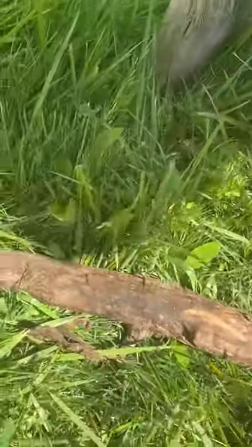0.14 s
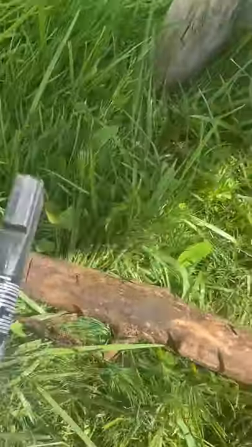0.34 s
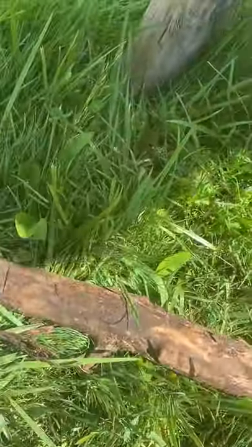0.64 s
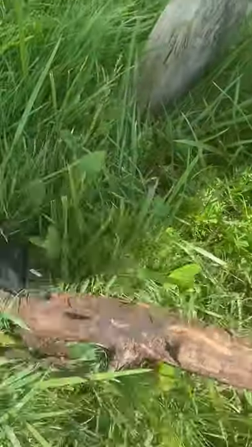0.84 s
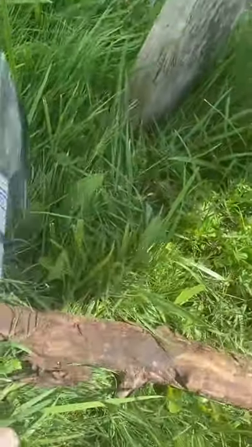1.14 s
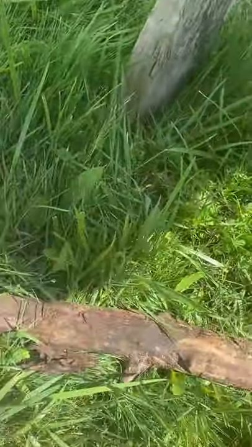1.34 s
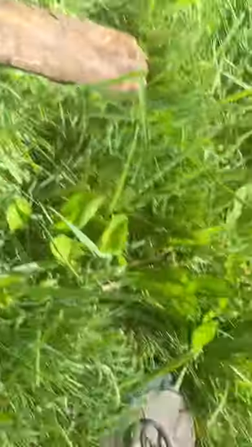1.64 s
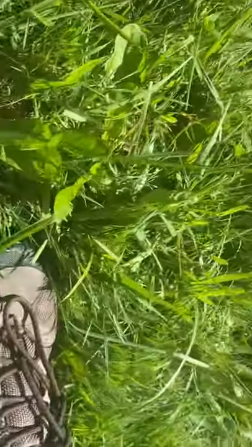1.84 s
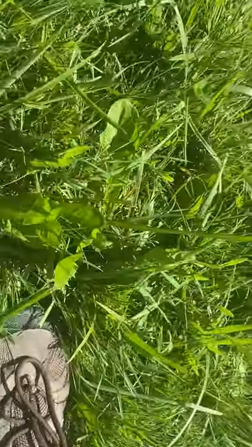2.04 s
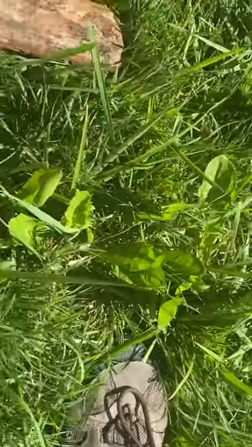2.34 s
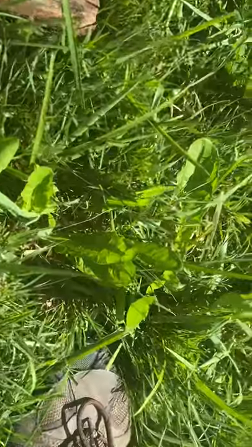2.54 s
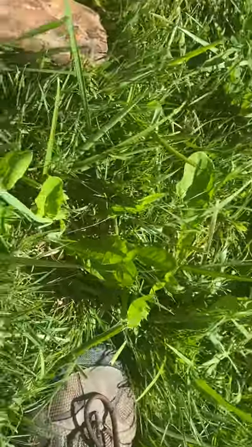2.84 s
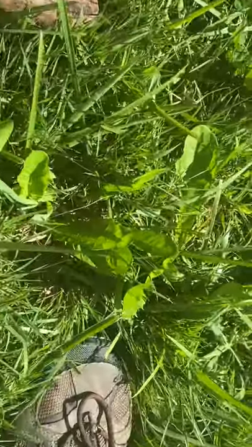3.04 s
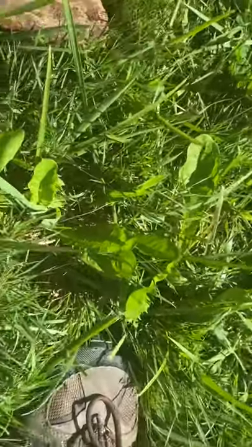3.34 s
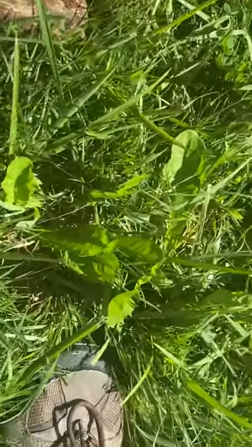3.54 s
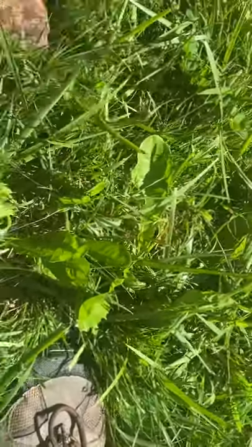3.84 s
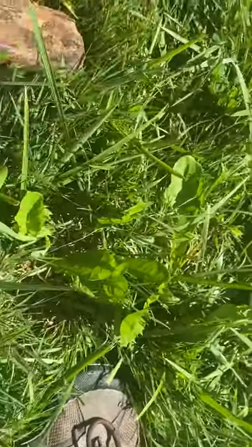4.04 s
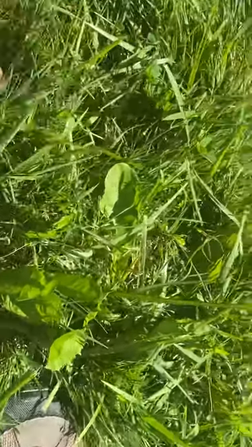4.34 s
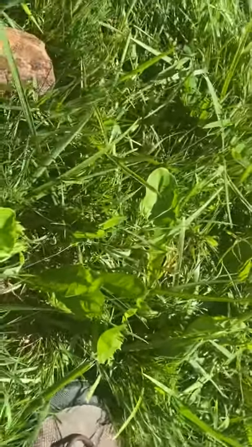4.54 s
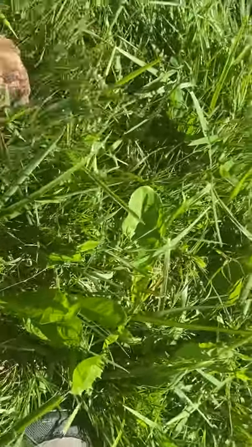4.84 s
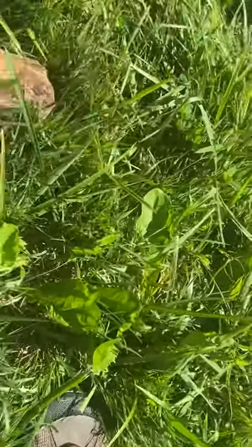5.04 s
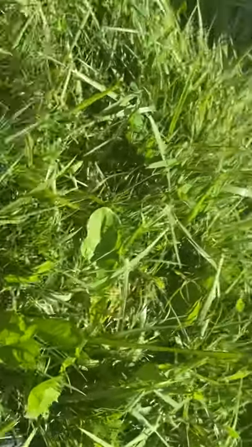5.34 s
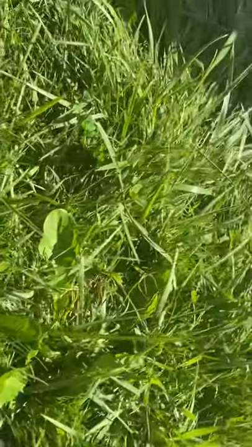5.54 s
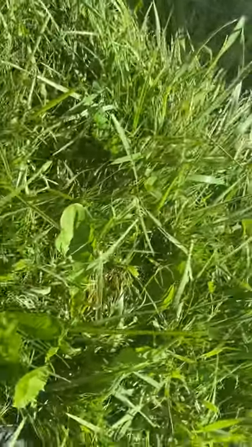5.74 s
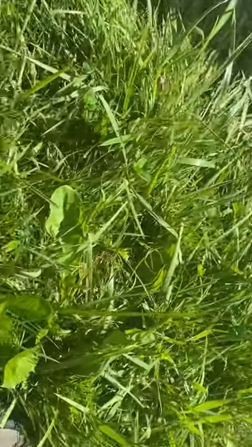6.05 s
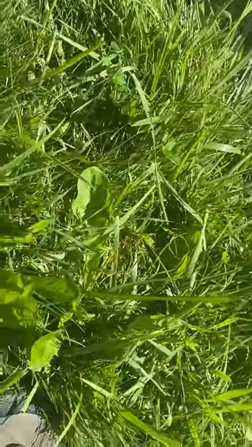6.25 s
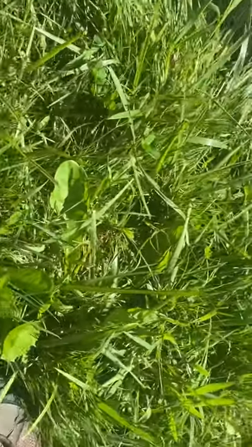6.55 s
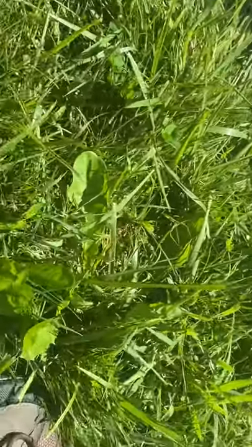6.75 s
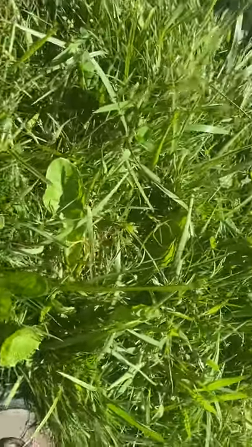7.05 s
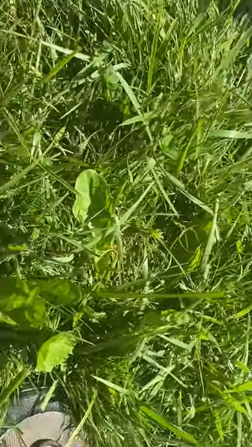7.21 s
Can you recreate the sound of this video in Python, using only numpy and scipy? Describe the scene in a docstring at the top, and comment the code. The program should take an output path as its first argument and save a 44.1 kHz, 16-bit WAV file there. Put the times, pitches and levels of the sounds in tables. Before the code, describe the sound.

Twelve sharp hatchet chops crack into a dry dead branch on turf, each with a woody knock and low thump, grass rustling, faint birds.

```python
"""A small hatchet chops twelve times into a dead branch that lies in long grass, close to the microphone.
Each blow cracks the fibres (noise bursts), rings the dry wood (clicked modes) and thumps it into the turf (low sines).
Grass rustles between blows (coloured clicks), a sleeve rubs, chips tick and something hollow knocks softly.
Far off, a bird whistles a few long notes (wavering sines) while others chip and chatter (swells of noise).
A nearly steady low outdoor rumble lies under it all."""
import sys
import numpy as np
from scipy import signal
from scipy.fft import rfft, irfft, next_fast_len
from scipy.io import wavfile

SR = 44100
rng = np.random.default_rng(int(sys.argv[2]) if len(sys.argv) > 2 else 0)


def generate_wav(signal):
    """Clip the signal to [-1, 1] and save it as 16-bit WAV at the path in sys.argv[1]."""
    frames = np.transpose(np.atleast_2d(signal))
    scaled = np.clip(frames, -1, 1) * 32767
    pcm = np.round(scaled).astype(np.int16)
    wavfile.write(sys.argv[1], SR, pcm)


N = 325364
TIME = np.arange(N) / SR
BLOW_S = 0.5   # room given to each short sound
AGE = TIME[:int(BLOW_S * SR)]   # seconds since a short sound began
LEVEL_WINDOW_S = 0.05


def from_db(db):
    """Decibels to gain."""
    return 10 ** (np.asarray(db) / 20)


def rms_one(x):
    """Scale to rms 1."""
    return x / np.sqrt(np.mean(x ** 2) + 1e-20)


def at_level(x, db):
    """Scale a short sound so that its energy, spread over the level window, has this rms."""
    window_rms = np.sqrt(np.sum(x ** 2) / (LEVEL_WINDOW_S * SR) + 1e-20)
    return x * from_db(db) / window_rms


def add(track, sound, s):
    """Mix a sound into a track at a time."""
    i = max(int(round(s * SR)), 0)
    part = sound[..., :max(N - i, 0)]
    track[..., i:i + part.shape[-1]] += part


def at_hz(points, hz):
    """Read a spectrum on a log-frequency axis."""
    knots, values = np.transpose(points)
    return np.interp(np.log(np.maximum(hz, 1)), np.log(knots), values)


def coloured(x, points):
    """Causal (minimum-phase) filter with a given spectrum, falling 40 dB in the octave beyond each end."""
    size = 2 * next_fast_len(len(x) // 2 + 2048)
    hz = np.arange(size // 2 + 1) * SR / size
    below = (points[0][0] / 2, points[0][1] - 40)
    above = (points[-1][0] * 2, points[-1][1] - 40)
    log_gain = np.log(from_db(at_hz([below, *points, above], hz)))
    # folding the cepstrum onto positive times makes the filter minimum-phase
    cepstrum = irfft(log_gain)
    cepstrum[1:size // 2] *= 2
    cepstrum[size // 2 + 1:] = 0
    return irfft(rfft(x, size) * np.exp(rfft(cepstrum)))[:len(x)]


def drift(rate):
    """Slow chance with rms 1: random knots, this many per second, joined by straight lines."""
    knots = rng.standard_normal(int(N / SR * rate) + 2)
    return rms_one(np.interp(TIME * rate, np.arange(len(knots)), knots))


def ring(force, hz, t60):
    """One mode: a unit click sets a dying sine of starting height 1 ringing."""
    radius = from_db(-60 / (t60 * SR))
    angle = 2 * np.pi * hz / SR
    return signal.lfilter([0, np.sin(angle)], [1, -2 * radius * np.cos(angle), radius ** 2], force + 1e-18)


def dying(t60):
    """Exponential decay, 60 dB down after t60 seconds."""
    return from_db(-60 * AGE / t60) + 1e-18


def swelling(hz, t60):
    """A heavy mode that is pushed down first, gathers motion and dies."""
    return -np.sin(2 * np.pi * hz * AGE) * hz * AGE * dying(t60)


def swell(s, half_s, db):
    """A smooth rise and fall of gain around a moment."""
    return from_db(db) * np.exp(-np.minimum(((TIME - s) / half_s) ** 2, 50))


def grains(size, spread_db):
    """Dense clicks of uneven strength."""
    return rng.standard_normal(size) * from_db(spread_db * np.minimum(rng.exponential(1, size), 5))


# spectrum of the outdoor rumble: pitch_hz, level_db
AIR_COLOUR = [(25, -25), (45, -7.5), (100, -3.5), (150, -13), (250, -20), (350, -22), (520, -29),
              (700, -37.5), (1300, -36.5), (1650, -36), (2200, -47), (5000, -53), (14000, -72.5)]


def outdoor_rumble(level_db=-51.5, waver_db=1.2):
    """Low, nearly steady rumble far off: coloured noise whose level wavers slightly."""
    waver = waver_db * drift(8)
    return from_db(level_db + waver) * rms_one(coloured(rng.standard_normal(N), AIR_COLOUR))


# bumps of the hand that holds the microphone: start_s, level_db
BUMPS = [(0.021, -40.5), (0.039, -32), (0.073, -38.5), (0.09, -34)]
# low modes of the microphone's body: pitch_hz, level_db, t60_s
BUMP_MODES = [(78.3, 0, 0.036), (200, -13, .022)]


def microphone_bumps():
    """The hand shifts on the microphone and pushes the low modes of its body."""
    out = np.zeros(N)
    for s, db in BUMPS:
        bump = sum(from_db(mode_db) * swelling(hz, t60) for hz, mode_db, t60 in BUMP_MODES)
        add(out, at_level(bump, db), s)
    return out


# steps and shuffles in the grass: middle_s, half_length_s, level_db
SHUFFLES = [(0.024, 0.045, -54.5), (0.721, 0.062, -61.5), (0.868, 0.041, -55), (1.746, .1, -68),
            (2.54, .045, -65.5), (4.064, 0.031, -70), (5.463, 0.024, -63.5), (7.12, 0.044, -62)]


def grass_shaking(level_db=-65.5, rise_s=.022, fade_s=0.079):
    """How strongly the grass moves: each step swells, each blow shakes it for a while and then it calms."""
    shaking = sum(swell(*shuffle) for shuffle in SHUFFLES)
    for s, *_, length_s, _ in CHOPS:
        rise = np.clip((TIME - s) / rise_s, 0, 1)
        fade = np.exp(-np.clip((TIME - s - length_s) / fade_s, 0, 30))
        shaking += from_db(level_db) * rise * fade
    return shaking


# spectrum of the rustling grass: pitch_hz, level_db
RUSTLE_COLOUR = [(800, -1.5), (2000, 0), (3000, -4), (5000, -2.5), (7500, -4.5), (8500, -4.5), (9400, -3.5),
                 (10500, -2.5), (11400, -10.5), (12200, -29.5), (15000, -31)]


def rustling_grass(shaking, flutter_db=2.5, snaps_per_s=67, snaps_db=-7.5):
    """Blades brush in dense fluttering clicks, and dry stalks snap now and then while the grass moves."""
    blades = from_db(flutter_db * drift(40)) * rms_one(grains(N, spread_db=2.5))
    snaps = rms_one((rng.random(N) < snaps_per_s / SR) * rng.standard_normal(N))
    return shaking * rms_one(coloured(blades + from_db(snaps_db) * snaps, RUSTLE_COLOUR))


# spectrum of the rubbing sleeve: pitch_hz, level_db
RUB_COLOUR = [(500, -20), (900, -18), (1350, -13.5), (1580, -2.5), (1700, 0.5), (1850, -5), (2100, -15),
              (2500, -20), (2950, -15), (3500, -24.5), (5000, -35)]


def rubbing_sleeve(shaking, lift_lead_s=.27, lift_half_s=.15, waver_db=4.5, with_grass_db=-14):
    """Cloth noise swells as the arm lifts the hatchet, and a little whenever the grass is moved."""
    lifting = sum(swell(s - lift_lead_s, lift_half_s, sleeve_db) for s, *_, sleeve_db in CHOPS)
    moving = np.hypot(lifting, from_db(with_grass_db) * shaking)
    cloth = rms_one(coloured(rng.standard_normal(N), RUB_COLOUR))
    return moving * from_db(waver_db * drift(15)) * cloth


# short raspy bird chips: middle_s
CHIPS = [0.055, 1.3, 2.256, 2.975, 3.513, 5.228, 6.311]
# spectrum of a chip: pitch_hz, level_db
CHIP_COLOUR = [(2000, -8), (3500, -9), (4400, 5.5), (6400, 0.5), (7600, -16)]


def bird_chips(level_db=-57, half_s=0.017):
    """Hoarse chips, all of one length and level: short swells of noise through the throat."""
    chips = sum(swell(s, half_s, level_db) for s in CHIPS)
    return chips * rms_one(coloured(rng.standard_normal(N), CHIP_COLOUR))


# bouts of lower, evenly spaced chatter: first_call_s, end_s, level_db
CHATTER = [(0.07, .14, -57.5), (0.461, .54, -61), (0.59, .67, -60)]
# spectrum of the chatter: pitch_hz, level_db
CHATTER_COLOUR = [(1400, -6), (2300, 4), (2900, -2.5), (3700, -11.5), (5200, -9), (6500, -29)]


def bird_chatter(gap_s=0.043, half_s=.013):
    """Evenly spaced calls, lower than the chips: swells of noise through the throat."""
    calls = 0
    for first, end, db in CHATTER:
        for s in np.arange(first, end, gap_s):
            calls = calls + swell(s, half_s, db)
    return calls * rms_one(coloured(rng.standard_normal(N), CHATTER_COLOUR))


# soft hollow knocks: start_s, level_db
KNOCKS = [(0.143, -46.5), (0.859, -63), (1.461, -59), (2.528, -52.5), (5.492, -55.5), (6.217, -62.5),
          (7.36, -61)]


def hollow_knocks(low_hz=430, high_hz=545, t60=0.05):
    """Something hollow knocks softly: two modes swell and die together."""
    out = np.zeros(N)
    for s, db in KNOCKS:
        add(out, at_level(swelling(low_hz, t60) + swelling(high_hz, t60), db), s)
    return out


# edges between the registers of the wood: pitch_hz
REGISTER_EDGES_HZ = [420, 900, 1450, 2400, 4000]
# ringing of the dry wood, damped by the blade inside it, before detuning: pitch_hz, level_db, t60_s
WOOD = [(520, -4.5, 0.033), (574, -0.5, .022), (751, 2.5, 0.026), (829, -3, 0.025), (974, -2.5, 0.026),
        (1175, -4.5, 0.02), (1234, -0.5, 0.02), (1435.2, -3.5, 0.023), (1536, -1, 0.014), (1670, 1, 0.024),
        (1823, 0, 0.017), (2066, -0.5, 0.011), (2202, -3.5, .014), (2630, -6, 0.0085), (2822, 3, 0.0098),
        (3320, -2.5, 0.0092), (3710, -5.5, 0.0031)]


def wood_ring(bite_s, levels_db, detune=.03, snap_share=0.12, spread=0.17):
    """The edge lands, then fibres snap while it sinks in; every spot on the branch rings a little differently."""
    out = 0
    sinking = 1 / (1 + (AGE / bite_s) ** 8)
    for low, high, db in zip(REGISTER_EDGES_HZ, REGISTER_EDGES_HZ[1:], levels_db):
        register = np.zeros((2, len(AGE)))
        for hz, mode_db, t60 in WOOD:
            if low <= hz < high:
                force = snap_share * sinking * rng.standard_normal(len(AGE))
                force[0] += rng.choice([-1, 1])   # the edge lands
                pitch = hz * (1 + detune * rng.standard_normal())
                # a second, heavily damped mode softens the onset
                motion = ring(ring(force, pitch, t60), pitch, .003)
                # each mode radiates its own way to left and right
                sides = 1 + spread * rng.standard_normal() * np.array([[1], [-1]])
                register += from_db(mode_db) * motion * sides
        out = out + np.sqrt(2) * at_level(register, db)
    return out


# spectrum of splitting dry wood: pitch_hz, level_db
CRACK_COLOUR = [(2500, -19), (3800, 5), (5200, 0), (7000, -2.5), (8400, -2), (9600, 0), (11000, -2.5),
                (12200, -22), (13500, -17), (15000, -17.5), (16500, -32)]


def crack(db, t60=0.013, splinter_db=-23, splinter_t60=0.14):
    """The first split of the dry surface, then a sprinkle of splinters."""
    burst = grains(len(AGE), spread_db=4.5) * dying(t60)
    splinters = grains(len(AGE), spread_db=-0.5) * dying(splinter_t60)
    return at_level(coloured(burst + from_db(splinter_db) * splinters, CRACK_COLOUR), db)


# spectrum of the scatter from the ground and of woody ticks: pitch_hz, level_db
SCATTER_COLOUR = [(150, -5), (350, 2.5), (600, 2), (1000, 3), (1350, -2.5), (1680, 9), (2150, -8),
                  (2500, -8), (2900, -3), (3400, -15.5), (4500, -20.5), (7000, -21), (10500, -16.5),
                  (12200, -43.5)]


def ground_scatter(db, t60=0.091):
    """The ground around throws back a short burst of dying noise."""
    return at_level(coloured(rng.standard_normal(len(AGE)) * dying(t60), SCATTER_COLOUR), db)


def thump(hz, t60=0.019, start_ratio=2.8, sink_s=.0021):
    """The note starts high on the short stiff stretch under the blade and sinks as the whole branch bends."""
    pitch = hz * (1 + (start_ratio - 1) * np.exp(-AGE / sink_s))
    return -np.sin(2 * np.pi * np.cumsum(pitch) / SR) * AGE * dying(t60)


def handle_note(db, hz=335.4, t60=.31):
    """Long note of the hatchet's handle, levelling off after its first cycles and dying slowly."""
    return from_db(db) * swelling(hz, t60) / (hz * AGE + 1)


# spectrum of the branch settling after the thud: pitch_hz, level_db
SETTLE_COLOUR = [(30, -7), (55, 2.5), (100, -1.5), (170, -5), (300, -22.5)]


def settling(db, t60=0.18):
    """The branch settles in a low burst of dying noise."""
    return at_level(coloured(rng.standard_normal(len(AGE)) * dying(t60), SETTLE_COLOUR), db)


def bedded(s, pair):
    """A property of the branch as it beds down: (lying loose until 2.3 s, bedded in the turf from 4.3 s)."""
    return np.interp(s, (2.3, 4.3), pair)


# hatchet blows: start_s, blade_stop_time_s, thump_db, wood_ring_db, spot_hardness_db, crack_db,
# handle_db, rustle_length_s (after the blow), sleeve_db (on the lift before it)
CHOPS = [(0.1685, .0048, -21.5, -22, -7.5, -44, -39.5, 0.2, -74),
         (0.7303, 0.0039, -21, -20, -3.5, -41.5, -31, .24, -67.5),
         (1.9565, 0.0027, -18, -21.5, 6, -40, -29, 0.32, -70.5),
         (2.5726, .0058, -23.5, -25.5, 10, -33, -32, 0.23, -77.5),
         (3.1507, 0.0041, -17.5, -25, 5.5, -27, -25, 0.4, -68),
         (3.7155, .0043, -16, -24.5, 7, -28.5, -32.5, 0.36, -68.5),
         (4.2619, 0.0034, -18, -25, 0, -35, -26.5, 0.19, -63.5),
         (4.8003, 0.0042, -17, -26.5, -6, -30.5, -27, 0.32, -72),
         (5.3252, 0.0034, -15, -26.5, 3, -33, -25.5, 0.23, -69),
         (5.8567, 0.0033, -18, -26, -3, -29, -29.5, 0.2, -72.5),
         (6.366, .0034, -19, -28.5, -4, -32.5, -28, 0.2, -77),
         (6.8779, .0036, -16, -25.5, 1, -32, -22.5, .38, -78.5)]
# wood registers, relative to the ring: loose_db, bedded_db, gain_db_per_hardness_db
REGISTERS = [(1, -1.5, -0.09), (-4.5, -0.7, -.5), (1, 0.5, 0.0648), (-14, -5.5, 1)]
# the turf giving way under the branch, relative to the thud: pitch_hz, level_db, t60_s
TURF = [(98.5, -1, .055), (61, -9.5, 0.097)]
THUMP_HZ = (163, 190.3)   # (loose, bedded)
THUD_DB = (-3.5, -9.5)   # (loose, bedded), relative to the thump


def chopping(scatter_db=-9, settle_db=-16, wood_lead_s=.0006, thump_lead_s=.0007, turf_lead_s=0.0019):
    """Each blow cracks and rings the wood; as the blade stops come thump, thud, handle, scatter and settling."""
    out = np.zeros((2, N))
    for s, bite_s, thump_db, ring_db, hardness_db, crack_db, handle_db, _, _ in CHOPS:
        stop = s + bite_s
        wood_db = [ring_db + bedded(s, (loose, firm)) + share * hardness_db
                   for loose, firm, share in REGISTERS]
        thud_db = thump_db + bedded(s, THUD_DB)
        add(out, wood_ring(bite_s, wood_db), s - wood_lead_s)
        add(out, crack(crack_db), s)
        add(out, ground_scatter(np.mean(wood_db) + scatter_db), stop)
        add(out, at_level(thump(bedded(s, THUMP_HZ)), thump_db), stop - thump_lead_s)
        for hz, db, t60 in TURF:
            add(out, at_level(swelling(hz, t60), thud_db + db), stop - turf_lead_s)
        add(out, handle_note(handle_db), stop)
        add(out, settling(thud_db + settle_db), stop)
    return out


# bark chips and twigs snapping or landing: start_s, woody_db, bright_db
TICKS = [(0.863, -58.5, -74), (0.886, -68, -63), (1.161, -71.5, -86), (1.815, -63, -91),
         (1.937, -52.5, -59.5), (2.056, -52.5, -67.5), (2.198, -71, -60), (2.562, -51.5, -59),
         (4.771, -59, -65.5), (5.47, -62.5, -67), (5.99, -64, -67.5)]


def chip_ticks():
    """Bark chips and twigs tick: short dying grains, a woody part and a bright part."""
    out = np.zeros(N)
    for s, woody_db, bright_db in TICKS:
        woody = coloured(grains(len(AGE), spread_db=2.5) * dying(0.037), SCATTER_COLOUR)
        bright = coloured(grains(len(AGE), spread_db=-0.9) * dying(0.052), CRACK_COLOUR)
        add(out, at_level(woody, woody_db) + at_level(bright, bright_db), s)
    return out


# whistled notes, before warble and waver: start_s, end_s, first_pitch_hz, last_pitch_hz, level_db
WHISTLES = [(1.534, 1.94, 4615, 4640, -73), (2.034, 2.431, 4360, 4360, -68.5),
            (2.45, 2.924, 4270, 4310, -74.5), (2.749, 3.395, 2916, 2930, -79.5),
            (2.85, 3.6, 4520, 4620, -76.5)]


def bird_whistles(waver_db=3.5, warble_hz=45, warble_depth_hz=17):
    """Long gliding sines whose pitch warbles, both evenly and by chance, while their level wavers."""
    out = np.zeros(N)
    for start, end, first_hz, last_hz, db in WHISTLES:
        glide = np.interp(TIME, [start, end], [first_hz, last_hz])
        warble = np.sin(2 * np.pi * warble_hz * TIME) + drift(160)
        hz = glide + warble_depth_hz * warble
        held = np.clip(np.minimum(TIME - start, end - TIME) / .03, 0, 1)   # 30 ms fades
        tone = np.sqrt(2) * np.sin(2 * np.pi * np.cumsum(hz) / SR)
        out += held * from_db(db + waver_db * drift(90)) * tone
    return out


# lead of the left microphone port: pitch_hz, lead_rad
PORT_PHASE = [(0, 0), (200, 0.39), (450, 0.65), (850, 1.43), (1300, 1.67), (1900, 0.85), (3000, 0.74),
              (6500, 0.14), (8000, -1.6), (9730, -7.5), (12400, -8.5), (16000, -19.5)]
# left port minus right port: pitch_hz, level_db
PORT_BALANCE = [(80, 0.43), (230, -2.95), (580, 2), (720, -2.8), (980, 2.5), (1400, 4.5), (1680, -3.5),
                (2000, 6), (3000, -0.3), (6000, 1.1), (8500, -1.5), (14000, 2.5)]


def ports(x):
    """Two microphone ports hear the same sound, with a lag and a shadow that depend on pitch."""
    size = 2 * next_fast_len(N // 2 + 2048)
    hz = np.arange(size // 2 + 1) * SR / size
    # each port takes half of the difference, in opposite directions
    lead = np.interp(hz, *np.transpose(PORT_PHASE))
    half = from_db(at_hz(PORT_BALANCE, hz) / 2) * np.exp(.5j * lead)
    return irfft(rfft(x, size) * np.array([half, 1 / half]))[:, :N]


def scene():
    """Chopping and rustling close by, birds and a nearly steady low rumble far off."""
    shaking = grass_shaking()
    moves = rustling_grass(shaking) + rubbing_sleeve(shaking)
    contacts = microphone_bumps() + hollow_knocks() + chip_ticks()
    birds = bird_chips() + bird_chatter() + bird_whistles()
    return ports(outdoor_rumble() + moves + contacts + birds + chopping())


def record(dry):
    """The loudest peaks are rounded off below 0.92 and the top is cut at 16.5 kHz."""
    rounded = dry / (1 + (dry / .92) ** 8) ** (1 / 8)
    top_cut = signal.ellip(10, .1, 90, 16500, fs=SR, output="sos")
    return signal.sosfilt(top_cut, rounded)


dry = scene()
out = record(dry)
generate_wav(out)
```